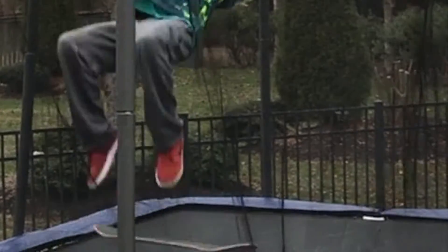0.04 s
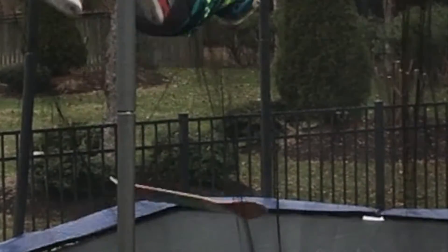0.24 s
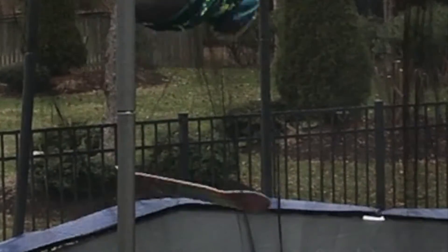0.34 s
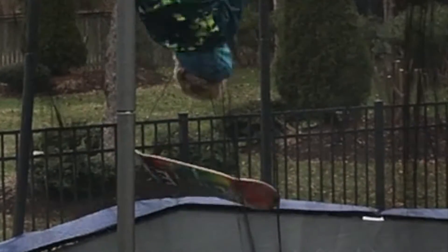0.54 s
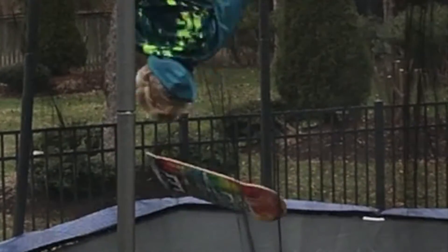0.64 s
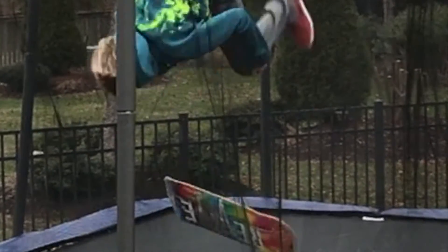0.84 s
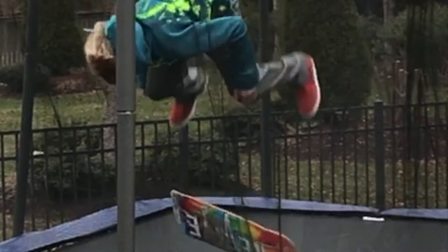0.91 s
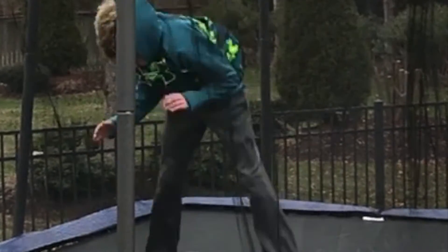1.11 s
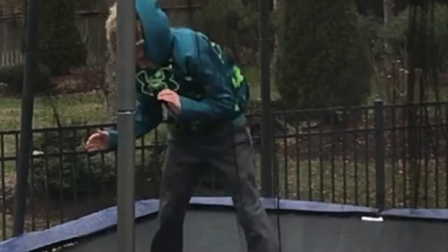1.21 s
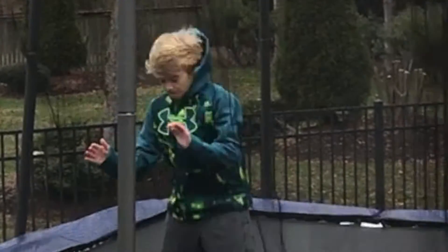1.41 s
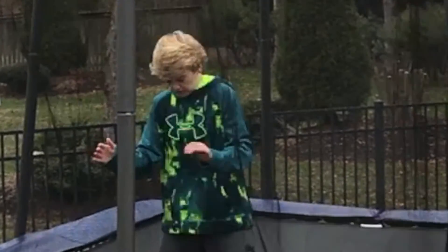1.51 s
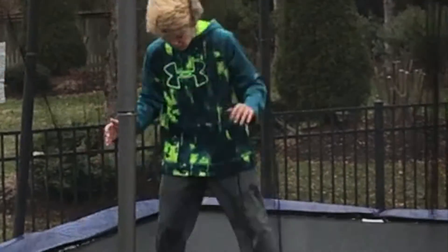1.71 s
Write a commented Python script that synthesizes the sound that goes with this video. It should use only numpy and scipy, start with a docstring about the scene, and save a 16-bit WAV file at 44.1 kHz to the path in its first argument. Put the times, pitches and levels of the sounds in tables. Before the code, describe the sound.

Dull bumps sound as a child flips above a garden trampoline, after a light rustle of clothes. The landing brings a scuff, deep wobbles and a swelling mat swish. Wind rumbles on the microphone throughout.

```python
"""In a garden, a child flips above a trampoline, lands and sinks into the mat.
Dull bumps, likely at the microphone, and deep wobbles ring as damped oscillations over a low shudder.
Sliding friction makes the clothes rustle in the air and the mat swish as it lets go, is hit and
stretches. Turbulent wind rumbles on the microphone over a faint outdoor hush."""
import sys
import numpy as np
from scipy import signal
from scipy.fft import rfft, irfft
from scipy.io import wavfile
from scipy.ndimage import uniform_filter1d

SR = 44100
rng = np.random.default_rng(int(sys.argv[2]) if len(sys.argv) > 2 else 0)


def to_wav(s):
    """Save 16-bit WAV."""
    ch = np.atleast_2d(s).T  # columns
    pcm = np.round(np.clip(ch, -1, 1) * 32767)  # PCM
    wavfile.write(sys.argv[1], SR, pcm.astype(np.int16))


N = 77175
TIME = np.arange(N) / SR


def from_db(db):
    """Amplitude ratio of a level: a factor of ten for every 20 dB."""
    return 10 ** (np.asarray(db) / 20)


def rms_one(x):
    """Normalisation to unit mean power."""
    return x / np.sqrt(np.mean(x ** 2) + 1e-20)


def level(rows):
    """Amplitude envelope, linear in decibels between points of (time [s], level [dB])."""
    return from_db(np.interp(TIME, *np.transpose(rows)))


def coloured(x, spectrum):
    """Spectral shaping by points of (frequency [Hz], relative level [dB]), at unit power."""
    hz, db = np.transpose(spectrum)
    bin_hz = np.maximum(np.arange(N // 2 + 1) * SR / N, 1)
    gain = from_db(np.interp(np.log(bin_hz), np.log(hz), db))
    bass_rolloff = np.minimum(bin_hz / hz[0], 1) ** 2
    return rms_one(irfft(rfft(x) * gain * bass_rolloff, N))


def friction(spectrum, slips_per_s=5000, spread_db=3.5, slip_share=.43, flutter_db=.8, flutter_hz=45):
    """Stick-slip friction of fabric: tiny fibre slips in smooth hiss, modulated by an uneven grip."""
    slips = (rng.random(N) < slips_per_s / SR) * rng.choice([-1, 1], N)
    slips = slips * from_db(spread_db * np.minimum(rng.exponential(1, N), 5))
    flutter = coloured(rng.standard_normal(N), [(flutter_hz / 2, 0), (flutter_hz, 0), (flutter_hz * 10, -60)])
    rubbing = np.sqrt(slip_share) * rms_one(slips) + np.sqrt(1 - slip_share) * rng.standard_normal(N)
    return from_db(flutter_db * flutter) * coloured(rubbing, spectrum)


def stroke(onset, db, attack, t60):
    """Transient envelope: a quadratic rise, then exponential decay by 60 dB in t60 seconds."""
    age = TIME - onset
    rise = np.clip(age / attack, 0, 1) ** 2
    return rise * from_db(db - 60 * np.maximum(age - attack, 0) / t60)


def soft_blow(peak_s, db, hz, rise_cycles, sharpness):
    """A damped oscillator under a soft push: the swing builds to its peak and dies away."""
    cycles = (TIME - peak_s) * hz
    progress = np.clip(1 + cycles / rise_cycles, 0, 60)  # 1 at the peak
    envelope = (progress * np.exp(1 - progress)) ** sharpness
    return from_db(db) * envelope * np.cos(2 * np.pi * cycles)


def wind():
    """Turbulence at the microphone: low pressure fluctuations whose strength follows the gusts."""
    # gust strength: (time [s], level [dB])
    gusts = [(0, -32.5), (.08, -47), (.18, -37.5), (.25, -30), (.31, -37), (.45, -30), (.62, -35),
             (.75, -37), (.86, -35), (.95, -44), (1.06, -42), (1.16, -34), (1.28, -36), (1.35, -39.5),
             (1.5, -35.5), (1.6, -45), (1.7, -39)]
    # eddy spectrum: (frequency [Hz], relative level [dB])
    spectrum = [(20, 2), (35, 0.5), (50, -2.5), (74, 1), (110, -12), (170, -22.5), (300, -29), (600, -46.5),
                (1500, -70.5)]
    eddies = coloured(rng.standard_normal(N), spectrum)
    running_rms = np.sqrt(uniform_filter1d(eddies ** 2, size=3000) + 1e-9)
    return level(gusts) * eddies / running_rms


def hush(base_db=-52.5):
    """Ambient noise: a faint broadband floor that sinks a little and returns."""
    # outdoor spectrum: (frequency [Hz], relative level [dB])
    spectrum = [(100, -7), (200, -3), (320, 0.5), (550, -1), (750, -7.5), (1100, -14), (1900, -17.5),
                (2700, -26), (5000, -32), (8800, -35.5)]
    # drift about the base level: (time [s], relative level [dB])
    drift = [(0, 1), (.35, 1), (.42, -2), (.55, -2.5), (.85, -1), (1.2, 1.3), (1.75, 2)]
    return from_db(base_db) * level(drift) * coloured(rng.standard_normal(N), spectrum)


def mat_take_off():
    """Friction noise fades as the mat lets go."""
    # fading swish: (time [s], level [dB])
    fade = [(0, -52.5), (.07, -53.5), (.12, -59.5), (.18, -74), (.3, -93)]
    # swish spectrum: (frequency [Hz], relative level [dB])
    spectrum = [(200, -3.5), (650, 0.5), (1500, -4.5), (3300, -12), (5000, -23), (8800, -29)]
    return friction(spectrum) * level(fade)


def clothes():
    """Cloth rubs as the body turns in the air; the incoherent rustles add in power."""
    # rubs: (onset [s], peak level [dB], attack [s], 60 dB decay time [s])
    rustles = [(.061, -52.5, .015, .25), (.093, -58, 0.019, 0.13), (.200, -52, .012, .31),
               (.240, -58, .018, .26), (.319, -61.5, .006, .13), (.369, -56.5, .011, 0.1),
               (.930, -64, .004, .05)]
    # cloth spectrum: (frequency [Hz], relative level [dB])
    spectrum = [(300, -8), (700, -3), (1600, -5), (2600, -5), (3100, -2), (3550, -1), (4000, -9),
                (5000, -11.5), (8800, -19)]
    return friction(spectrum) * np.sqrt(sum(stroke(*row) ** 2 for row in rustles))


def shudder():
    """Low noise swells and decays exponentially, ahead of and under the dull bumps."""
    # swells: (onset [s], peak level [dB], attack [s], 60 dB decay time [s])
    swells = [(.205, -42.5, 0.022, .5), (.325, -46, .02, .3), (.378, -26, .022, .52),
              (.768, -43, 0.024, 0.06)]
    # rumble spectrum: (frequency [Hz], relative level [dB])
    spectrum = [(45, -3.5), (72, 1.5), (150, 0.5), (250, -9), (450, -15.5), (700, -31), (1200, -59.5)]
    return coloured(rng.standard_normal(N), spectrum) * sum(stroke(*row) for row in swells)


def bumps(tail_db=-14.5, tail_t60_s=.16, tail_hz=450):
    """Knocks, likely from handling the microphone: heavily damped to a cycle or two, with a faint tail."""
    # knocks: (peak time [s], peak level [dB], frequency [Hz])
    blows = [(.4038, -12.5, 280), (.4083, -11.5, 130), (0.4165, -16.5, 105), (0.4196, -24.5, 342),
             (.4400, -22, 156), (.4490, -19.5, 418), (.4580, -28, 250), (0.4837, -28, 266),
             (0.5128, -24.5, 137), (0.5254, -26, 220), (0.5869, -34, 222), (.6222, -25, 335),
             (.6255, -18.5, 181), (0.6836, -26, 182), (.7800, -27, 160), (0.7923, -30, 180),
             (0.8098, -31.5, 100), (1.2480, -35.5, 258), (1.2620, -30, 170), (1.4640, -30, 112)]
    knocks = sum(soft_blow(*row, rise_cycles=1.055, sharpness=5.76) for row in blows)
    tail = rng.standard_normal(N) * from_db(-60 * TIME / tail_t60_s)
    tail = signal.sosfilt(signal.butter(2, tail_hz, fs=SR, output="sos"), tail / np.linalg.norm(tail))
    return knocks + from_db(tail_db) * signal.fftconvolve(knocks, tail)[:N]


def wobbles():
    """Lighter damping lets these deep oscillations last a few cycles."""
    # deep swings: (peak time [s], peak level [dB], frequency [Hz])
    swings = [(0.437, -23.5, 45), (0.567, -26.5, 33.1), (1.398, -29, 52.2), (1.484, -25.5, 46)]
    return sum(soft_blow(*row, rise_cycles=1.72, sharpness=2.2) for row in swings)


def shoe_scuff():
    """Sliding friction: shoes rub the mat briefly on landing."""
    # one rub: (onset [s], peak level [dB], attack [s], 60 dB decay time [s])
    scuff = (1.293, -39.5, .037, .17)
    # scuff spectrum: (frequency [Hz], relative level [dB])
    spectrum = [(150, -10), (240, -2), (320, 5.5), (420, -3), (720, -10.5), (1200, -4), (1650, -3.5),
                (2400, -19), (4500, -21), (8800, -29)]
    return friction(spectrum) * stroke(*scuff)


def mat_stretch(crossover_hz=4800):
    """Friction noise of the stretching mat, whose treble brightens as it lifts."""
    # swish envelope, before the treble gain: (time [s], level [dB])
    swell = [(1.277, -88), (1.283, -54.5), (1.34, -59), (1.39, -56), (1.44, -53.5), (1.54, -50),
             (1.575, -44), (1.615, -41.5), (1.66, -40.5), (1.695, -44), (1.75, -47)]
    # swish spectrum: (frequency [Hz], relative level [dB])
    spectrum = [(150, -14), (330, -3), (700, -0.5), (1300, -5.5), (2000, -5.5), (2500, -9), (3200, -8),
                (4200, -14.5), (5200, -21), (5700, -18.5), (6900, -19.5), (8300, -18.5)]
    # treble above the crossover: (time [s], gain [dB])
    brightness = [(1.28, 0), (1.55, -2.5), (1.61, 1.5), (1.68, .5), (1.74, 4)]
    swish = friction(spectrum)
    body = signal.sosfiltfilt(signal.butter(2, crossover_hz, fs=SR, output="sos"), swish)
    treble = swish - body
    return (body + treble * level(brightness)) * level(swell)


def scene():
    """Superposition: the pressures of all sources add at one microphone."""
    background = wind() + hush()
    jump = mat_take_off() + clothes()
    low_sounds = shudder() + bumps() + wobbles()
    landing = shoe_scuff() + mat_stretch()
    return (background + jump + low_sounds + landing)[None]


def record(dry):
    """Band limiting: an elliptic low-pass cuts the treble steeply."""
    cutoff_hz = 8880
    return signal.sosfilt(signal.ellip(14, .1, 90, cutoff_hz, fs=SR, output="sos"), dry)


dry = scene()
out = record(dry)
to_wav(out)
```